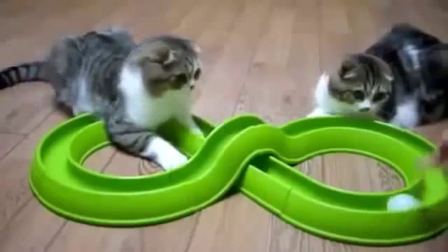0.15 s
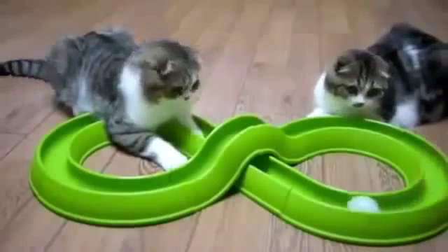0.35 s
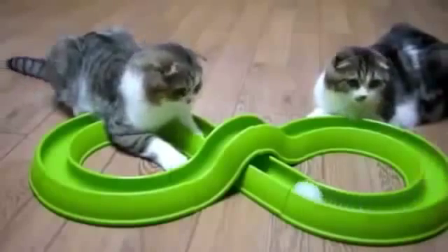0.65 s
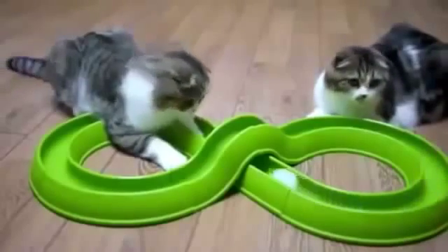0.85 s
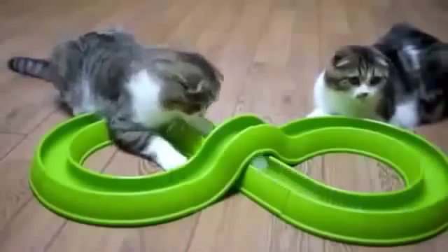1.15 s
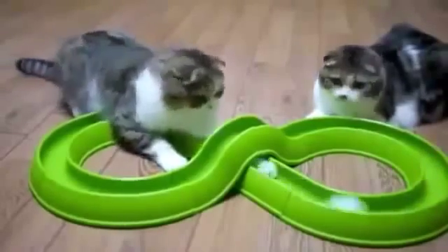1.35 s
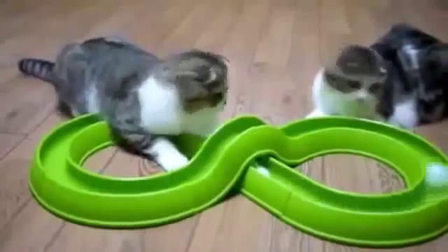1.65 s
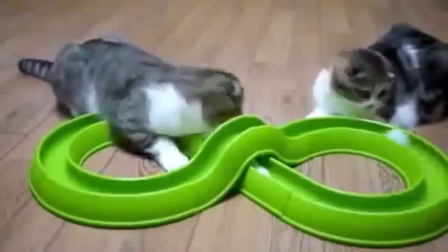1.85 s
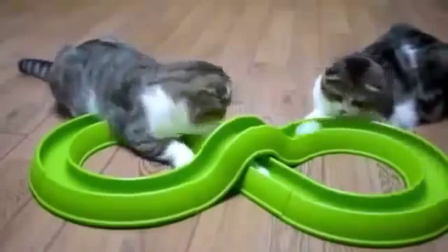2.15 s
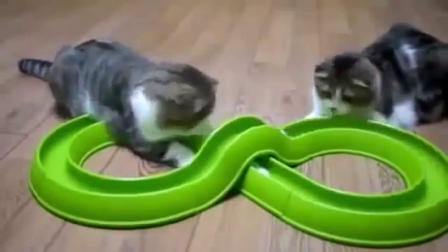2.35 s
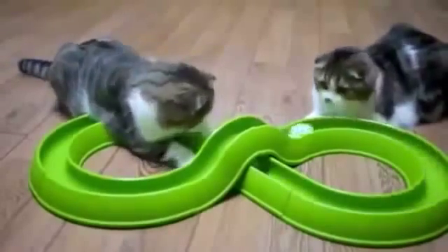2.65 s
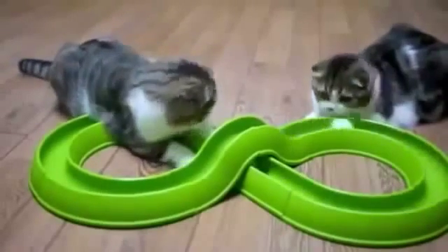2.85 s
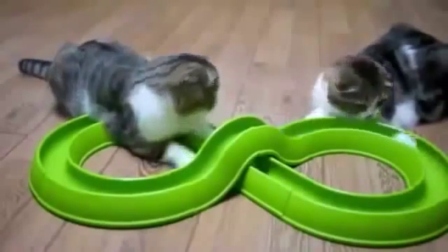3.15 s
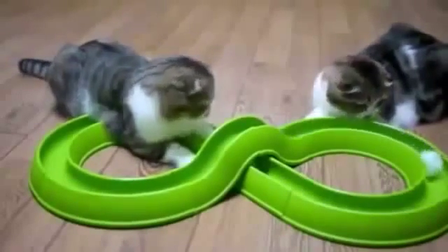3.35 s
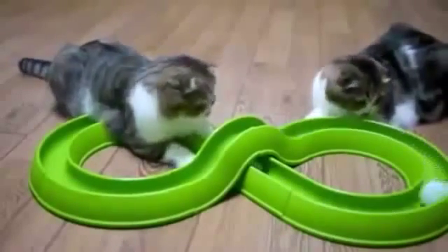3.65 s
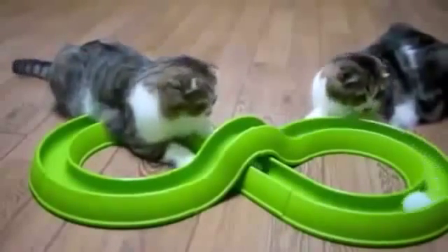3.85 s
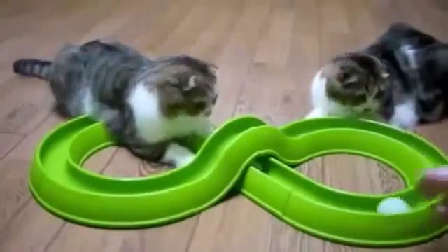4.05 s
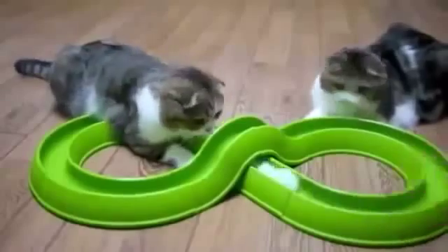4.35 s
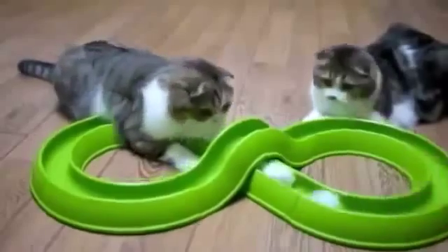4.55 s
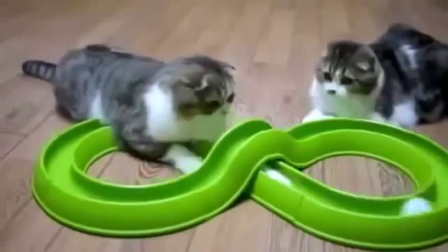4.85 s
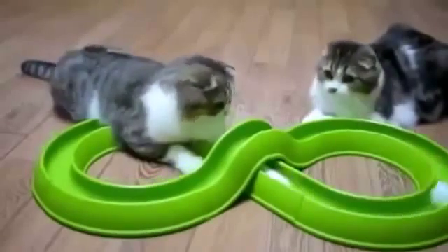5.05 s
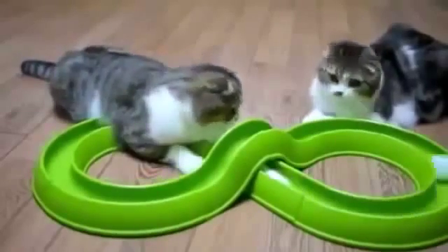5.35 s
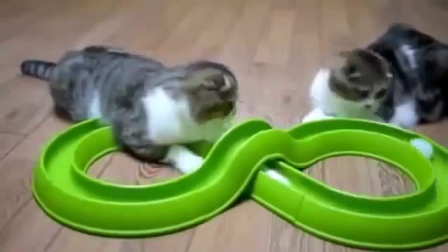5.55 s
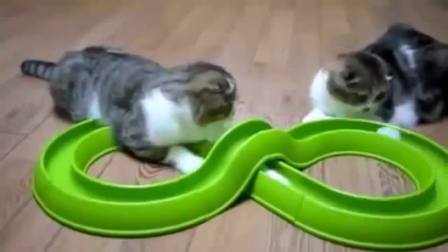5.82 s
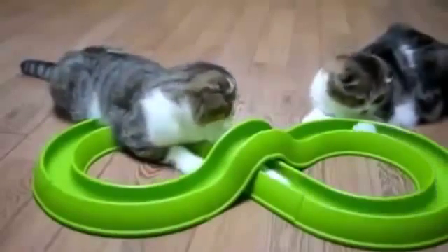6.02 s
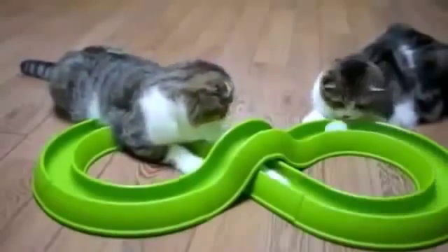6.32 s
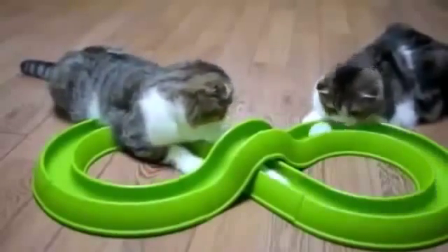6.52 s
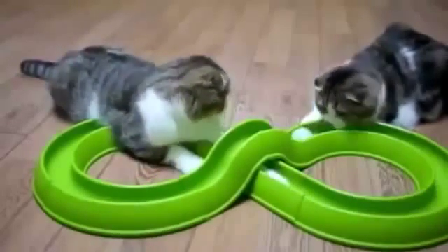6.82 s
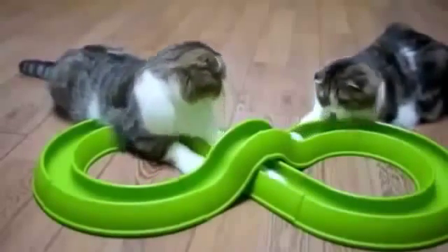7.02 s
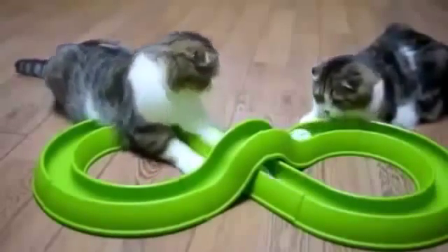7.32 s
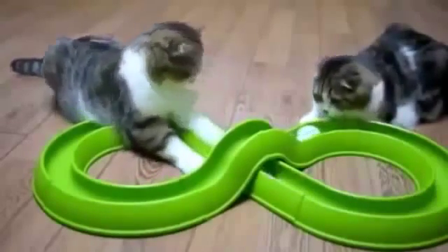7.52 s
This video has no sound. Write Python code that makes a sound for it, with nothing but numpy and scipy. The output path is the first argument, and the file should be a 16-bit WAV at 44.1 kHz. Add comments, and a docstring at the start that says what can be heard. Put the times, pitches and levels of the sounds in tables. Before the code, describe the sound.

In a bare room with soft hiss and a very faint hum, a hollow plastic ball starts quietly at about 0.3 s, ticking and rolling weakly in its track until 1.4 s. A sharp scuff and a dense cluster of clacks at 1.45-1.6 s launch a loud, hollow rumble with irregular knocks, strong to about 2.5 s. It dips near 2.6 s, then rolls again around 3 s and weakens. A brief stuttering plastic judder comes at 3.95 s and a gritty scrape at 4.4 s. From 4.45 to 4.95 s the loudest rattle erupts, with bright mid-pitched clacks over a fast roll, the hardest near 4.6 s. It falls away by 5 s. Around 5.2 s there is a small scuff, a judder and a soft dull floor thud. Faint rolling and sparse light taps then dwindle into hiss, the last tiny tap near 7.6 s. The plastic rings briefly and the room adds a short tail.

```python
"""In a bare room with a wooden floor, two cats and a hand push a hollow plastic ball round a plastic track.
Random small contacts make the ball rumble and patter along the channel; brief filtered blows are its knocks.
Pushes scuff the plastic in gritty slips, or make it judder by stick and slip; the floor thuds once, softly.
Decaying modes of the track and diffuse reflections follow every contact, over hiss and a faint hum."""
import sys
import numpy as np
from scipy import signal
from scipy.fft import rfft, irfft
from scipy.io import wavfile
from scipy.ndimage import uniform_filter1d

SR = 44100
rng = np.random.default_rng(int(sys.argv[2]) if len(sys.argv) > 2 else 0)


def waveform_to_disk(signal):
    """Save audio, clipped to [-1, 1], as 16-bit WAV at the path in sys.argv[1]."""
    frames = np.transpose(np.atleast_2d(signal))
    scaled = np.clip(frames, -1, 1) * 32767
    samples = np.round(scaled).astype(np.int16)
    wavfile.write(sys.argv[1], SR, samples)


N = 338508
TIME = np.arange(N) / SR

# ball against the track: (time [s], blow level [dB], centre of the clack [Hz],
# thump level before lift and cap [dB], tick level before tilt [dB])
BALL_KNOCKS = [(0.323, -23, 1900, -11, -26), (0.333, -31.5, 2100, -15, -24), (0.397, -33, 1170, -31, -19.5),
               (0.449, -36.5, 1050, -9, -16), (0.518, -37, 1060, -11, -18), (0.618, -31, 1040, -24, -25),
               (0.644, -37, 1130, -14, -25), (0.687, -30.5, 1080, -29, -29), (0.721, -42, 1110, -14, -33),
               (0.843, -32.5, 1120, -6, -19), (0.944, -28, 1050, -13.5, -11), (1.097, -33.5, 1130, -10, -7),
               (1.2, -35.5, 845, -25, -14.5), (1.442, -33.5, 960, -7, -13), (1.466, -25, 1100, -15, -4),
               (1.482, -17, 950, -9, -11), (1.524, -13.5, 750, -24, -13), (1.529, -12, 964, -10.5, -5.5),
               (1.541, -23.5, 800, -6, -21.5), (1.568, -21, 1630, -25.5, -14.5),
               (1.572, -9, 1730, -17, -25), (1.605, -26, 1720, -9, -25), (1.664, -25.5, 1060, -17.5, -17),
               (1.75, -24.5, 1620, -22, -24), (1.76, -24.5, 1040, -20, -22),
               (1.798, -16.5, 1470, -17.5, -14), (1.831, -13, 1300, -32, -25),
               (1.934, -23.5, 1590, -21, -30), (1.947, -19.5, 915, -26, -13.5),
               (2.057, -25.5, 1040, -9, -10), (2.072, -27.5, 1280, -9, -18), (2.104, -19, 1860, -22, -6.5),
               (2.129, -20.5, 1510, -21.5, -18), (2.271, -23, 1060, -14.5, -13),
               (2.31, -26.5, 1500, -14, -31), (2.345, -28, 1000, -8, -12.5), (2.414, -25, 1070, -27, -10.5),
               (2.483, -22, 1560, -16.5, -23), (2.503, -16.5, 2200, -13, -17.5),
               (2.698, -30.5, 2170, -43, -14), (2.888, -23.5, 1800, -18.5, -14),
               (2.913, -24.5, 1090, -25, -14), (2.986, -20, 1170, -17, -17), (3.112, -26, 1050, -13, -17),
               (3.176, -31.5, 970, -27, -24), (3.268, -27.5, 991, -21, 7), (3.333, -36, 1520, -7, -10),
               (3.384, -28.5, 1830, -35, -13), (3.395, -21.5, 1390, -18, -29),
               (3.416, -24.5, 825, -34, -13.5), (3.512, -24.5, 1580, -11, -13.5),
               (3.655, -28.5, 1090, -20, -19), (3.908, -31, 1720, -3, -11),
               (4.429, -21.5, 1660, -16.5, -11), (4.494, -13, 1610, -34, -25.5),
               (4.527, -11, 1720, -35, -11.5), (4.556, -22, 1820, -11, -25), (4.593, -13, 1530, -26, -22),
               (4.598, -4.5, 1480, -31.5, -15), (4.634, -16.5, 1680, -5, -10), (4.751, -16, 1860, -21, -14),
               (4.762, -11, 1660, -9.5, -11), (4.839, -17, 1640, -16, -18.5), (4.934, -30, 1130, -22, -25),
               (4.996, -26, 1060, -28, -22), (5.335, -34.5, 1060, -23, -28),
               (5.498, -30.5, 970, -20, -16.5), (5.591, -31.5, 990, -20, -17),
               (5.606, -31.5, 970, -12, -30), (5.77, -34.5, 1170, -33, -20), (5.809, -34, 1060, -24, -15),
               (5.877, -25.5, 1760, -17, -18), (5.944, -30, 1390, -11, -28),
               (6.084, -36.5, 1020, -19.5, -32), (6.327, -34, 990, -21, -28), (6.496, -35, 999, -26, -22),
               (6.847, -33, 1040, -25, -18), (7.079, -34, 1630, -1.5, -22), (7.57, -43, 985, -8, -13)]


def undb(db):
    """Level to amplitude: 20 dB is a factor of ten."""
    return 10 ** (np.asarray(db) / 20)


def unit(x):
    """Normalisation to a root-mean-square amplitude of 1."""
    return x / np.sqrt(np.mean(x ** 2))


def at_hz(points, hz):
    """Interpolation of (frequency [Hz], value) points along a logarithmic frequency axis."""
    f, value = np.transpose(points)
    return np.interp(np.log(np.maximum(hz, 1)), np.log(f), value)


def colour(x, points):
    """Minimum-phase filtering: the folded cepstrum of the log gain yields a causal response."""
    size = 4096
    hz = np.arange(size // 2 + 1) * SR / size
    log_gain = np.log(undb(at_hz(points, hz)))
    cepstrum = irfft(log_gain)
    cepstrum[1:size // 2] *= 2
    cepstrum[size // 2 + 1:] = 0
    response = irfft(np.exp(rfft(cepstrum)))
    return signal.fftconvolve(x, response)[:len(x)]


def walk(rate):
    """Slow random modulation: normal values, each held 1 / rate s, slewed to a spread near 1."""
    hold = max(int(SR / rate), 2)
    steps = np.repeat(rng.standard_normal(N // hold + 1), hold)
    return 1.2 * uniform_filter1d(steps, hold)[:N]


def impacts(rate, spread_db):
    """Shot noise: tiny contacts of uneven size at random moments, rate a second on average."""
    happens = rng.random(N) < rate / SR
    sign = rng.choice([-1, 1], N)
    size_db = spread_db * np.clip(rng.standard_normal(N), -2, 2)
    return happens * sign * undb(size_db)


def add(out, s, x):
    """Superposition: mix x into out from time s."""
    i = max(int(s * SR), 0)
    out[i:i + len(x)] += x[:max(N - i, 0)]


def stroke(s, length, attack_s, release_s):
    """Envelope: a quadratic swell from time s, a hold until length is up and exponential decay."""
    t = TIME - s
    swell = np.clip(t / attack_s, 0, 1) ** 2
    return swell * np.exp(-np.maximum(t - length, 0) / release_s)


def background(air_db=-57.5, waver_db=1):
    """Steady filtered noise as hiss, and an appliance's hum as slowly wavering harmonics of 60 Hz."""
    # spectrum of the hiss: (frequency [Hz], relative density [dB])
    air_colour = [(25, -23.5), (50, -4), (100, -5), (200, 0), (350, -0.5), (600, -3.5), (1000, -4.5),
                  (1600, -5.5), (2300, -9.5), (3200, -11), (5900, -17), (7000, -25.5), (7600, -37)]
    # hum components: (frequency [Hz], rms level about which it wavers [dB])
    hum_tones = [(60, -80.5), (300, -66.5), (420, -67), (540, -83.5), (600, -69.5)]
    air = unit(colour(rng.standard_normal(N), air_colour)) * undb(air_db)
    hum = np.zeros(N)
    for hz, db in hum_tones:
        level = undb(db + waver_db * walk(2.2))
        hum += level * np.sin(2 * np.pi * (hz * TIME + rng.random()))
    return air + np.sqrt(2) * hum  # rms to peak of a sine


def pace_db():
    """Rolling noise grows with the ball's speed: its level at every sample, leaping at two hard pushes."""
    # (time [s], pace, as a level before the rolling's own gains [dB])
    pace_points = [(0.28, -61), (0.62, -49.5), (0.95, -50), (1.419, -53), (1.49, -40.5), (1.9, -37),
                   (2.45, -40.5), (2.62, -62.5), (2.85, -47.5), (3.0, -41), (3.5, -49), (3.8, -52.5),
                   (4.38, -56), (4.5, -35), (4.78, -30.5), (5.04, -50.5), (5.95, -48.5), (6.3, -57.5)]
    return np.interp(TIME, *np.transpose(pace_points))


def chatter(spot_hz, level_db=-13, rise_s=.004, t60=0.3, focus_db=5.5):
    """Decaying rebound: each knock sets off chatter in proportion to its force, most near its own pitch."""
    t = np.arange(SR // 2) / SR
    settle = np.minimum(t / rise_s, 1) * undb(level_db - 60 * t / t60)
    power = np.zeros(N)
    for s, db, hz, *_ in BALL_KNOCKS:
        # a spot an octave from the struck one chatters focus_db less
        loss_db = focus_db * abs(np.log2(hz / spot_hz))
        add(power, s, (undb(db - loss_db) * settle) ** 2)
    return np.sqrt(power)


def rolling(rate=65, spread_db=4, focus_db=9, gain_db=-8, rumble_db=-8, drum_hz=620, bounce_drum_db=-3):
    """Roughness excitation: the wobbling ball ticks on floor, wall and rim and drums on the hollow channel."""
    # spots that the ball touches, floor, wall and rim: (centre [Hz], relative level [dB])
    contact_spots = [(620, -1), (1090, 0.5), (1650, -2.5)]
    # filter of the ticks: (frequency [Hz], gain [dB])
    roll_colour = [(50, -47), (350, -13.5), (600, -1.5), (850, 4), (1080, 1), (1350, -3), (1750, -2),
                   (2300, -9.5), (3200, -17.5), (4200, -23), (6300, -26), (7500, -35.5)]
    # filter of the drumming: (frequency [Hz], relative gain [dB])
    rumble_colour = [(25, -41), (90, -20), (160, -7.5), (300, -1), (430, 3), (600, -1), (900, -1.5),
                     (2000, -51.5)]
    pace = pace_db()
    ticks, moving = [], []
    for hz, db in contact_spots:
        band = [(hz / 1.58, db - focus_db), (hz, db), (hz * 1.55, db - focus_db)]
        tick = colour(colour(impacts(rate, spread_db), band), roll_colour)
        ticks.append(tick)
        # steady rolling and chatter add in power
        moving.append(tick * np.hypot(undb(pace), chatter(hz)))
    patter = sum(moving) / np.std(sum(ticks))
    # drumming is -43.5 dB at a pace of -40 dB and gains 0.73 dB per dB, before rumble_db
    drum_db = -43.5 + 0.73 * (pace + 40)
    drumming = np.hypot(undb(drum_db), undb(bounce_drum_db) * chatter(drum_hz))
    rumble = unit(colour(impacts(900, 2.7), rumble_colour)) * drumming
    return undb(gain_db) * patter + undb(rumble_db) * rumble


def blow(hz, low_db, high_db, thump_hz=520, thump_db=10, thump_max_db=-1, tick_db=0, soft_tilt=0.34,
         slope_db=13, thump_slope_db=14, contact_s=0.0011):
    """Impact excitation: one brief, rasping contact with a shell clack, a track thump and a hard tick."""
    # spectrum of a hard tick: (frequency [Hz], relative density [dB])
    tick_colour = [(600, -23), (1500, 5), (2300, 5.5), (2900, 6), (3500, 0.5), (4300, 1.5), (6300, 0.5),
                   (9000, -18)]
    t = np.arange(SR // 25) / SR
    push = rng.choice([-1, 1], len(t)) * t ** 0.74 * np.exp(-t / contact_s)
    f = np.geomspace(30, 10000, 60)
    # clack and thump fall away with the octaves either side of their centres
    clack = -slope_db * np.abs(np.log2(f / hz)) ** 1.09
    thump = min(low_db + thump_db, thump_max_db) - thump_slope_db * np.abs(np.log2(f / thump_hz))
    # a soft contact has a weak tick, weakened further with each octave above 3300 Hz
    tilt = 1 + soft_tilt * np.maximum(np.log2(f / 3300), 0)
    tick = high_db * tilt + tick_db + at_hz(tick_colour, f)
    strongest = np.max([clack, thump, tick], axis=0)
    x = colour(push, np.column_stack([f, strongest]))
    # the energy of .6 ms at full level gives a peak near 1
    return x * np.sqrt(.0006 * SR) / np.linalg.norm(x)


def knocks(bounce_s=.0035, bounce_db=-11, gain_db=0):
    """Inelastic collision: the ball strikes a wall or joint, then strikes again more weakly."""
    # filter shared by all knocks: (frequency [Hz], gain [dB])
    knock_colour = [(40, -6), (200, -7.5), (500, 2.5), (1000, 0.5), (1800, 1), (2500, -5), (4000, -7.5),
                    (7000, -10)]
    out = np.zeros(N)
    for s, db, hz, low_db, high_db in BALL_KNOCKS:
        add(out, s, undb(db + gain_db) * blow(hz, low_db, high_db))
        again_s = s + bounce_s * (.7 + rng.random())
        add(out, again_s, undb(db + bounce_db) * blow(hz, low_db, high_db))
    return colour(out, knock_colour)


def scuffs(rate=650, spread_db=5, patchy_db=2, gain_db=0, focus_db=4, attack_s=0.027, release_s=0.015):
    """Sliding friction: a push drags ball and track in gritty, bright slips that come in patches."""
    # pushes: (time [s], length [s], level [dB], strongest pitch of the rubbed spot [Hz])
    scuff_events = [(1.438, 0.038, -41, 5000), (1.53, 0.062, -40, 1700), (1.771, 0.089, -43, 1500),
                    (2.404, 0.09, -42, 2700), (2.473, 0.034, -52.5, 2200), (3.265, .07, -61, 4000),
                    (4.381, 0.15, -36.5, 1900), (4.635, 0.17, -44.5, 1700), (5.16, .05, -50, 2500)]
    # filter of the slips: (frequency [Hz], relative gain [dB])
    scuff_colour = [(40, -30.5), (120, -5), (250, -4.5), (600, 7), (1100, -0.5), (1700, 9), (2300, 0.5),
                    (2900, 2), (4000, -3.5), (5000, 1.5), (6500, -6), (7500, -19)]
    slips = unit(colour(impacts(rate, spread_db), scuff_colour))
    slips = slips * undb(patchy_db * walk(90))
    out = np.zeros(N)
    for s, length, db, hz in scuff_events:
        # an octave from its pitch the rubbed spot is focus_db weaker
        band = [(hz / 2, -focus_db), (hz, 0), (hz * 2, -focus_db)]
        rubbed = unit(colour(slips, band))
        out += rubbed * undb(db + gain_db) * stroke(s, length, attack_s, release_s)
    return out


def judders(rate=380, spread_db=2, gain_db=-3, attack_s=0.0082, release_s=0.032):
    """Stick-slip: uneven, quickly repeated slips keep a few resonances of the plastic ringing."""
    # (time [s], length [s], level before gain_db [dB])
    judder_events = [(3.944, 0.05, -32), (4.19, .02, -53), (5.202, 0.065, -40.5)]
    # resonances of the plastic: (frequency [Hz], relative level [dB], t60 [s])
    judder_modes = [(1076, 1.5, 0.015), (1450, 5, 0.017), (1820, 9.5, 0.0085), (3170, -6.5, 0.018)]
    # filter of the wall: (frequency [Hz], relative gain [dB])
    judder_colour = [(100, -19), (700, -4), (1000, 6), (2000, -6), (2700, -5.5), (3500, -10.5),
                     (4500, -8.5), (7000, -15.5)]
    t = np.arange(SR // 20) / SR
    slip_rate = rate * np.exp(0.59 * walk(300))
    cycles = np.floor(np.cumsum(slip_rate) / SR)
    slips = np.diff(cycles, prepend=0) * undb(spread_db * rng.standard_normal(N))
    ring = sum(undb(db - 60 * t / t60) * np.cos(2 * np.pi * hz * t) for hz, db, t60 in judder_modes)
    sound = unit(colour(signal.fftconvolve(slips, ring)[:N], judder_colour))
    gain = np.zeros(N)
    for s, length, db in judder_events:
        gain += undb(db + gain_db) * stroke(s, length, attack_s, release_s)
    return sound * gain


def thud(start_s=5.15, hz=155, t60=0.4, rise_s=0.019, db=-53):
    """Damped oscillation: a soft, dull thud of the floor as a cat shifts its weight."""
    t = np.maximum(TIME - start_s, 0)
    return np.sin(2 * np.pi * hz * t) * (1 - np.exp(-t / rise_s)) * undb(db - 60 * t / t60)


def track(x, t60=0.36, ring_db=-1):
    """Modal resonance: the long plastic channel rings on after every contact, by convolution."""
    # modes of the track: (frequency [Hz], level before ring_db and scaling [dB])
    track_modes = [(342, 4), (415, 3), (536, 6.5), (606, 0.5), (859, -18.5), (988, 2), (1058, 9.5),
                   (1109, 1.5), (1165, -23), (1260, -11.5), (1637, -1), (1752, -11), (1846, -3),
                   (2073, -18.5), (2729, 2), (3459, -12)]
    t = np.arange(SR // 2) / SR
    decay = np.log(1000) / t60
    ring = sum(undb(db + ring_db) * np.cos(2 * np.pi * hz * t) for hz, db in track_modes)
    return signal.fftconvolve(x, ring * np.exp(-decay * t) * 2 * decay / SR)[:N]


def reflections(wet_db=-1.5, early_db=-6, early_t60=0.059):
    """Reverberation: quick reflections from floor and track, and a diffuse tail decaying band by band."""
    # decay of the room: (frequency [Hz], t60 [s])
    room_t60 = [(200, 0.35), (600, 0.51), (1400, 0.58), (3000, 0.5), (7000, 0.59)]
    t = np.arange(2 * SR // 3) / SR
    hz = np.arange(len(t) // 2 + 1) * SR / len(t)
    noise = rfft(rng.standard_normal(len(t)))
    edges = [0, 300, 600, 1200, 2400, 4800, 9600]  # Hz
    tail = np.zeros(len(t))
    for lo, hi in zip(edges, edges[1:]):
        t60 = at_hz(room_t60, (lo + hi) / 2)
        fade = undb(-60 * t / t60) * (1 - np.exp(-t / 0.0042))
        band = irfft(noise * (hz >= lo) * (hz < hi), len(t))
        tail += band * fade / np.linalg.norm(fade)
    early = rng.standard_normal(len(t)) * undb(-60 * t / early_t60) * (1 - np.exp(-t / 0.00066))
    return undb(wet_db) * tail + undb(early_db) * early / np.linalg.norm(early)


def room(x, count=32):
    """Position-dependent response: the ball moves on, so each stretch has its own reflections."""
    out, s = np.zeros(N), 0
    for stretch in np.array_split(x, count):
        add(out, s, signal.fftconvolve(stretch, reflections()))
        s += len(stretch) / SR
    return out


def scene():
    """Superposition of direct contacts, the track's ring, the room's reflections and the background."""
    contacts = knocks() + rolling() + scuffs() + judders() + thud()
    return (contacts + track(contacts) + room(contacts) + background())[None]


def record(dry, ceiling=0.65):
    """Soft saturation rounds the loudest peaks; a steep low-pass is 60 dB down from 8100 Hz."""
    low_pass = signal.cheby2(14, 60, 8100, fs=SR, output="sos")
    rounded = ceiling * np.tanh(dry / ceiling)
    return signal.sosfilt(low_pass, rounded)


dry = scene()
out = record(dry)
waveform_to_disk(out)
```